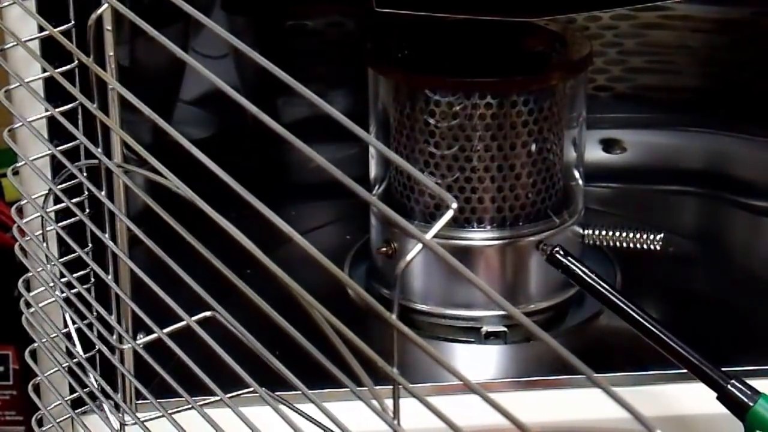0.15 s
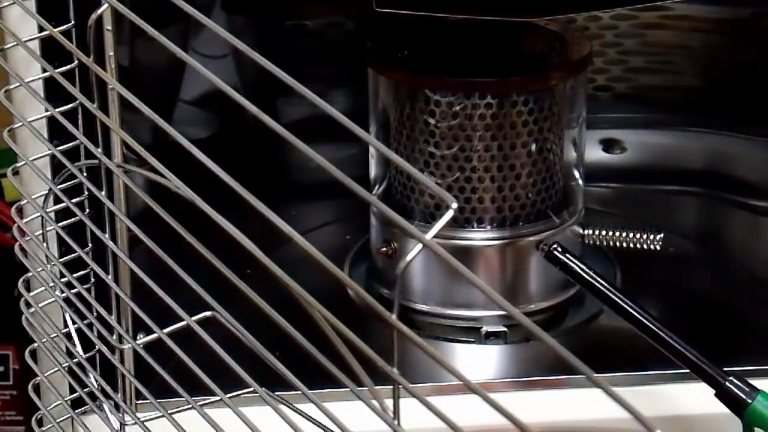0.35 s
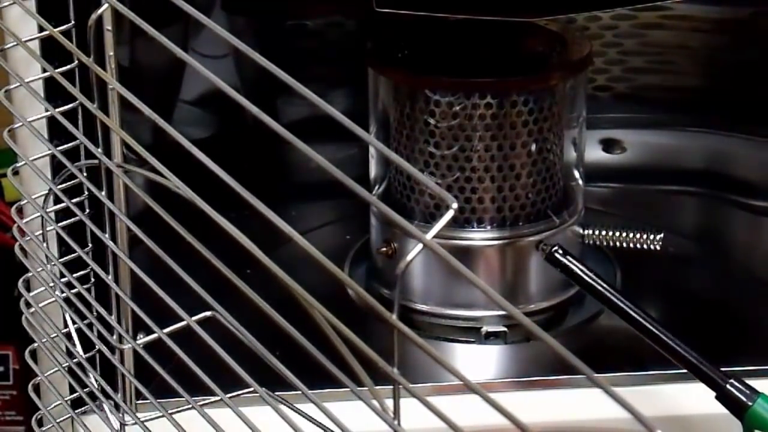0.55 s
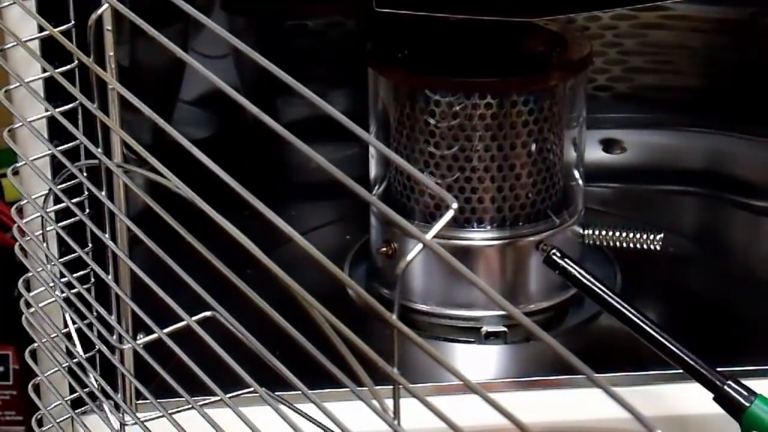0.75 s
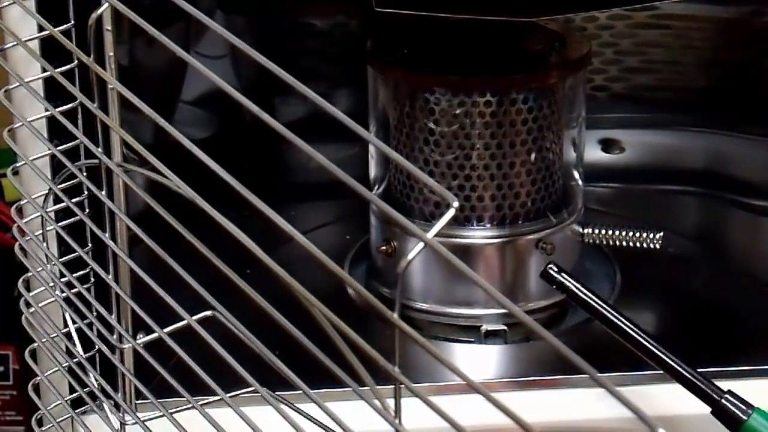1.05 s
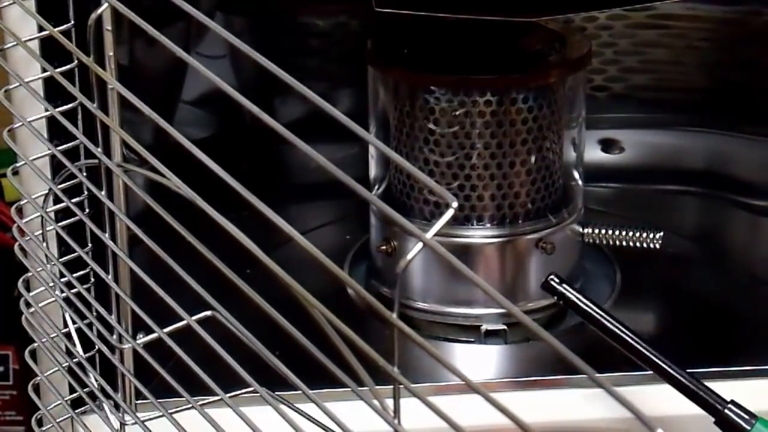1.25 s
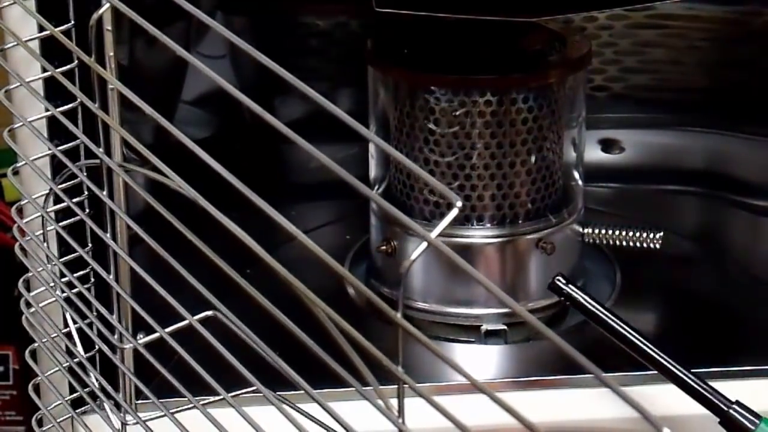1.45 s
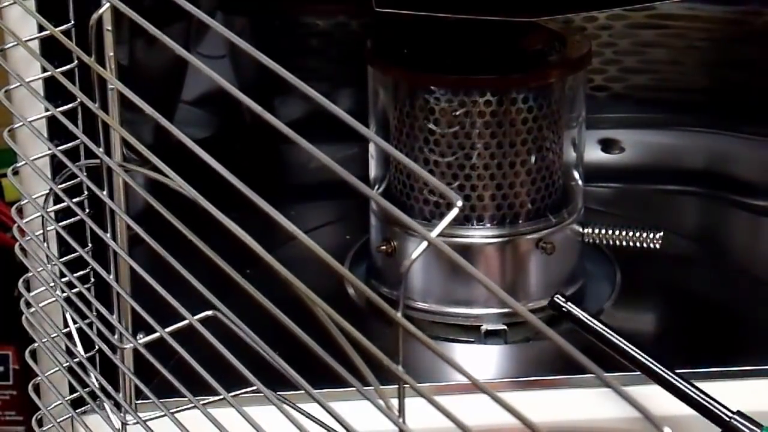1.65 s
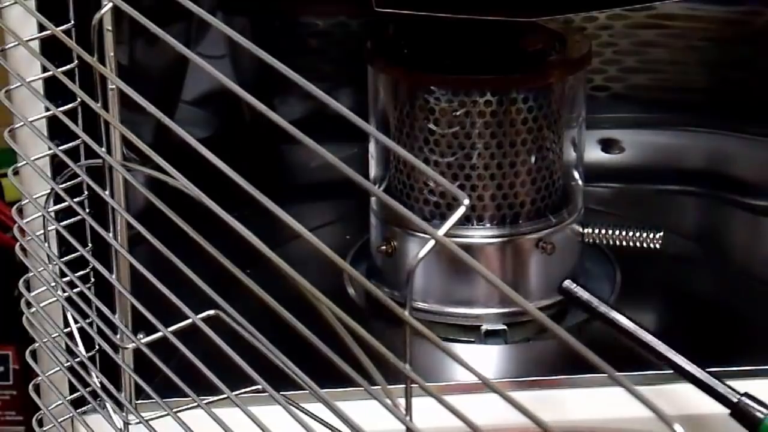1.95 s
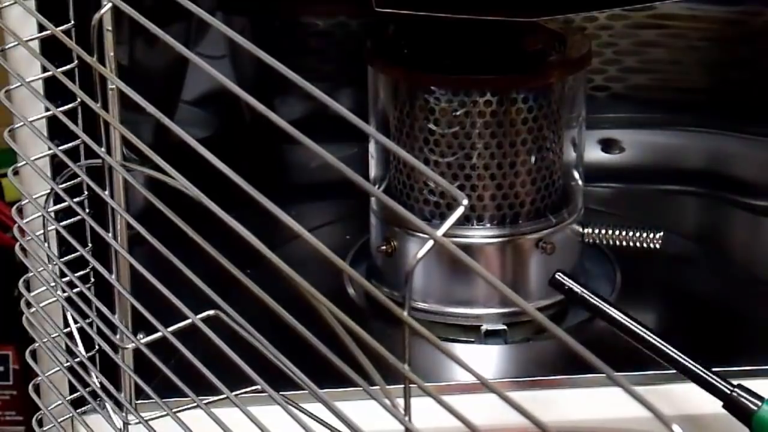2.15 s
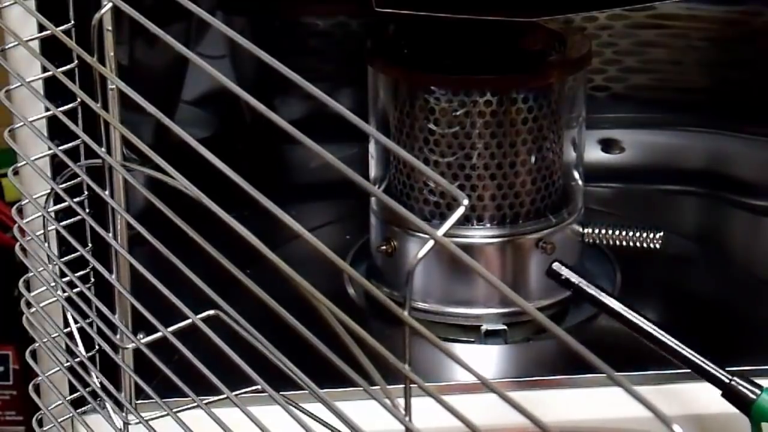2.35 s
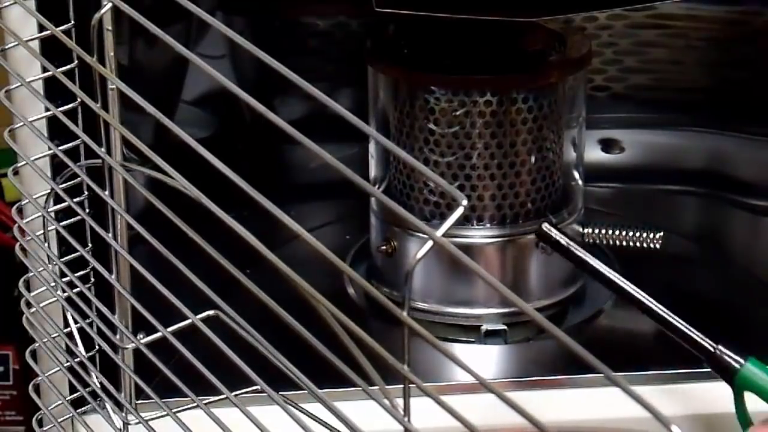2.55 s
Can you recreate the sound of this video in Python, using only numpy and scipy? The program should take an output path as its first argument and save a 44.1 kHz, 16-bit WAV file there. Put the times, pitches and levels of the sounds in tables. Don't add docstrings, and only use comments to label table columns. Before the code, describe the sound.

A utility lighter's igniter snaps nine times, very close to a small overloading microphone, with light plastic trigger ticks between snaps, thin metallic ringing and short garage echoes over faint hiss and hum.

```python
import sys
import numpy as np
from scipy import signal
from scipy.fft import rfft, irfft, next_fast_len
from scipy.io import wavfile
from scipy.ndimage import uniform_filter1d, map_coordinates

SR = 44100
rng = np.random.default_rng(int(sys.argv[2]) if len(sys.argv) > 2 else 0)


def volts_from_decibels(level):
    exponent = np.asarray(level, float) / 20
    return 10 ** exponent


def to_wav(s):
    ch = np.atleast_2d(s).T
    pcm = np.round(np.clip(ch, -1, 1) * 32767)
    wavfile.write(sys.argv[1], SR, pcm.astype(np.int16))


N = 119070


def hammer():
    # t/s, peak level/dB, grip/0-1 from first to second hold, rebound level/dB, lowest rings level/dB
    snaps = [
        (0.2083, -2.5, 0.02, -14, -0.5),
        (.6047, -3, 0.12, -26, 2),
        (0.9409, -3, 0.11, -23, 2.5),
        (1.264, -4, 0.42, -15, 4.5),
        (1.5135, -3.5, 0.38, -22, 4),
        (1.7244, -3.5, 0.67, -8, -13),
        (1.9223, -3.5, 0.75, -4, 1.5),
        (2.1366, -3, 0.95, -1, 0),
        (2.3644, -1.5, 0.98, -10, -1.5),
    ]
    # push level/dB, push length/s, push over its recoil/ratio, knock level/dB, echo
    # level/dB
    thumps = [
        (-23.5, .00035, 2.35, -41, 0.6),
        (-25, .00037, 2.03, -41, 0.1),
        (-24.5, .0004, 2.3, -37, 0.1),
        (-38, 0.00085, 2.3, -55, 1.5),
        (-33, .001, 3, -38.5, 1.9),
        (-32.5, .0007, 2.4, -49, 2.5),
        (-34.5, 0.00058, 2.9, -32, 2.5),
        (-26.5, .0007, 2.05, -37, 1.5),
        (-25, .0008, 2.15, -32, -1),
    ]
    # f/Hz, level/dB
    crack_colour = [(500, -51), (1150, -9), (1700, 1.5), (3300, 2.5), (6000, 1.3), (11500, -2.5),
                    (14000, -12), (16000, -12)]
    spark_db, spark_hold_s, spark_t60_s, spark_tilt_db = -4.5, 0.00053, 0.0055, 5.5
    out, t = np.zeros(N + 2 * SR), np.arange(SR // 20) / SR
    room, snap, metal = rng.standard_normal(SR), rng.standard_normal(len(t)), shell()
    for (s, db, grip, rebound_db, core_db), (push_db, push_s, lean, knock_db, echo_db) in zip(snaps, thumps):
        room, snap = kin(room), kin(snap)
        blow, core = body(t, grip, rebound_db, core_db)
        direct = blow + volts_from_decibels(-6) * crack(snap, t, crack_colour, hold_s=0.0024, t60=0.012)
        add(out, s, volts_from_decibels(db) * direct)
        spark = crack(snap[::-1], t, crack_colour, spark_hold_s, spark_t60_s, spark_tilt_db, 0.000528)
        add(out, s, volts_from_decibels(db + spark_db) * spark)
        add(out, s, volts_from_decibels(db + echo_db) * echoes(direct + 0.84 * (1 - volts_from_decibels(core_db)) * core))
        add(out, s, volts_from_decibels(db + echo_db / 2) * (garage(room, grip) + volts_from_decibels(4.5) * metal))
        add(out, s, thump(t, push_db, push_s, lean, knock_db))
    return out[:N]


def body(t, grip, rebound_db, core_db):
    # f/Hz, width/Hz, level/dB
    first_hold = [(1734, 280, -18), (4256, 240, -12.5), (4930, 200, -12), (5745, 400, -2.5),
                  (8980, 250, -12), (9080, 340, -8.5), (11255, 700, -14), (13400, 450, -29)]
    second_hold = [(4944, 370, -9), (5760, 180, -14), (6520, 290, -15), (8040, 290, -35), (8950, 140, -28),
                   (9570, 310, -9.5), (11400, 230, -20), (12520, 240, -19), (13000, 490, -31)]
    # f/Hz, width/Hz, level/dB
    first_core = [(3368, 270, -3), (2695, 200, -15.5)]
    second_core = [(3351, 500, -4), (2791, 200, -6), (3021, 200, -6.5)]
    # f/Hz, width/Hz, level/dB
    late_rings = [(5140, 270, -13), (5825, 230, -9), (6546, 200, -12.5), (7420, 400, -24)]
    swell_s, second_swell_s, late_swell_s = 0.0033, 0.0028, 0.0078
    rebound_s, damp_s, damp_t60_s = 0.0036, 0.0044, 0.011
    core = (1 - grip) * ring(first_core, t, swell_s) + grip * ring(second_core, t, second_swell_s)
    upper = (1 - grip) * ring(first_hold, t, swell_s) + grip * ring(second_hold, t, swell_s)
    blow = 0.86 * (upper + volts_from_decibels(core_db) * core)
    blow = blow + volts_from_decibels(rebound_db) * np.roll(blow, round(rebound_s * SR))
    blow = blow + ring(late_rings, t, late_swell_s)
    return blow * volts_from_decibels(-60 * np.clip(t - damp_s, 0, 1) / damp_t60_s), core


def thump(t, push_db, push_s, lean, knock_db):
    knock_hz, knock_s = 787, 0.0038
    u = t / push_s
    push = volts_from_decibels(push_db) * u * (lean - u) * np.exp(-u)
    swell = np.sin(np.pi * np.clip(t / knock_s, 0, 1))
    return push - volts_from_decibels(knock_db) * swell * np.sin(2 * np.pi * knock_hz * t)


def ring(modes, t, swell_s, tilt_db=0):
    swell_hz, swell_law, swell_shape = 3300, 1.5, 5
    hz, _, db = np.transpose(modes)[:, :, None]
    luck = rng.standard_normal((2, len(modes), 1))
    peak_s = swell_s * np.clip(swell_hz / hz, 0.1, 1.1) ** swell_law + 0.00046
    u = t / peak_s
    gain = volts_from_decibels(db + 0.37 * luck[0] + tilt_db * np.log2(hz / 5000))
    gain = gain * np.sqrt(u[:, 1:2] / u[:, 1].min())
    swell = (u * np.exp(1 - u)) ** swell_shape
    return np.sum(gain * swell * np.sin(2 * np.pi * (hz * t + luck[1])), 0)


def crack(noise, t, colour, hold_s, t60, tilt_db=0, rise_s=0.00059):
    noise = filtered(noise, lambda f: volts_from_decibels(along(colour, f) + tilt_db * np.log2((f + 1) / 5000)))
    fall = volts_from_decibels(-60 * np.clip(t - hold_s, 0, 1) / t60)
    return unit(noise) * fall * np.clip(t / rise_s, 0, 1) ** 2


def kin(noise):
    # f/Hz, likeness/0-1
    alike = [(1500, .96), (3500, .93), (6000, .86), (10000, .6), (16000, .4)]
    fresh = filtered(rng.standard_normal(len(noise)), lambda f: np.sqrt(1 - along(alike, f) ** 2))
    return filtered(noise, lambda f: along(alike, f)) + fresh


def trigger():
    # t/s, peak level/dB, brightness/dB per octave
    ticks = [(.455, -33, -3), (0.4612, -21.5, 1), (0.472, -35, -7), (0.8224, -19, 0.5), (0.8884, -36, 4),
             (1.1365, -19.5, 2.5), (1.4317, -17.5, -0.5), (1.6486, -18, 2), (1.8574, -19, -2),
             (1.851, -27, -2), (2.0664, -16.5, 0.5), (1.4287, -23.5, 0), (2.3005, -19.5, -1.5),
             (2.3087, -37, -3), (1.6405, -25, -3), (2.5615, -27, -6), (2.573, -30, -6), (.832, -34, -5),
             (1.148, -27, -3)]
    # t/s, peak level/dB, brightness/dB per octave
    take_ups = [
        (.5412, -28.5, -1.5),
        (.8994, -29, -1.5),
        (1.2226, -26.5, -2.5),
        (1.4785, -28, -4),
        (1.697, -26, -2.5),
        (1.885, -28, -4),
        (2.104, -30, -3.5),
        (2.335, -30, -3.5),
        (1.232, -28, -3),
    ]
    # t/s, peak level/dB, brightness/dB per octave
    stops = [
        (2.2898, -10.5, 0),
        (2.5587, -13.5, 1),
        (3.5, -24, -1),
        (3, -27, 0),
        (2.5785, -25, 0),
    ]
    # f/Hz, width/Hz, level/dB
    trigger_modes = [(2047, 390, -16), (4456, 370, 1), (4750, 200, -4), (4000, 200, -8), (5770, 220, -15),
                     (6700, 280, -8), (7000, 360, -18), (10300, 540, -5.5), (11600, 250, -7.5),
                     (13600, 370, -18),
                     (1287, 200, -13), (15300, 400, -21)]
    slack_modes = [(1280, 250, -12), (2130, 300, -6), (6900, 300, 4), (8700, 400, -7), (11600, 400, 0)]
    stop_modes = [(1280, 200, -19), (4430, 300, -1), (5800, 300, 3), (6870, 300, -3), (7530, 300, 1.5),
                  (10640, 400, -4)]
    # f/Hz, level/dB
    tick_colour = [(500, -57), (1200, -16), (2500, 2), (4500, 2), (7000, 0), (11000, -5.5), (14000, -9),
                   (16000, -28)]
    slack_colour = [(500, -55), (1200, -9), (2500, -3), (4500, -1), (7000, 1), (12000, -6), (16000, -20)]
    swell_s, tick_db, crack_db, crack_t60_s, room_db = 0.0017, -13.5, 3.5, 0.033, -8
    out, t = np.zeros(N + 2 * SR), np.arange(SR // 20) / SR
    motions = ((ticks, trigger_modes, tick_colour),
               (take_ups, slack_modes, slack_colour),
               (stops, stop_modes, tick_colour))
    for rows, modes, colour in motions:
        room = garage(rng.standard_normal(SR))
        for s, db, tilt_db in rows:
            noise = rng.standard_normal(len(t))
            grit = volts_from_decibels(crack_db) * crack(noise, t, colour, 0.0018, crack_t60_s, tilt_db, 0.00117)
            add(out, s, volts_from_decibels(db + tick_db) * (ring(modes, t, swell_s, tilt_db) + grit))
            add(out, s, volts_from_decibels(db + room_db) * room)
    return out[:N]


def shell():
    # f/Hz, level/dB, t60/s
    shell_modes = [(1788, -50, 0.25), (2100, -47.5, 0.76), (2070, -41, 0.55), (2230, -38, 0.55),
                   (2260, -52.5, 0.71), (2349, -49.5, 0.98), (2630, -47, 0.34), (2850, -43, 0.22),
                   (3060, -30, 0.3), (3170, -34, 0.31), (3310, -32.5, 0.47), (3340, -35.5, 0.58),
                   (5200, -39.5, 0.34), (5890, -40, 0.38)]
    hz, db, t60 = np.transpose(shell_modes)[:, :, None]
    t, luck = np.arange(SR) / SR, rng.standard_normal((2, len(shell_modes), 1))
    walk = rng.standard_normal((len(shell_modes), SR // 64 + 1)).cumsum(1)
    drift = uniform_filter1d(walk, size=8).repeat(64, axis=1)[:, :SR] / 4
    drift = uniform_filter1d(drift, size=64)
    fall = volts_from_decibels(db + 2.7 * luck[0] - 60 * t / t60)
    modes = fall * np.sin(2 * np.pi * (hz * t + 0.2 * luck[1] + 0.064 * drift))
    return modes.sum(0) * (1 - np.exp(-t / 0.04))


def echoes(x):
    # delay t/s, level/dB
    returns = [(.0062, -9), (.0089, -7.5), (.0137, -14), (.0167, -12.5), (.0215, -14.5), (.0307, -23.5),
               (.0377, -17.5), (.0442, -17.5), (.0492, -22), (.057, -21), (.063, -24.5)]
    # f/Hz, level/dB
    return_colour = [(1000, -11.5), (2000, -3.5), (3300, -2), (4500, -10), (6500, -7.5), (9000, -9.5),
                     (16000, -22)]
    out = np.zeros(SR // 5)
    for s, db in returns:
        add(out, s, volts_from_decibels(db) * x)
    return filtered(out, lambda f: volts_from_decibels(along(return_colour, f)))


def garage(noise, grip=0.44):
    # f/Hz, level/dB
    near_colour = [(500, -61), (1000, -31), (1500, -10.5), (3000, -9.5), (4000, -6.5), (6500, -10.5),
                   (7200, -12), (16000, -17)]
    far_colour = [(500, -40), (1000, -21), (1500, -8), (3000, -5), (4000, -7.5), (6500, -6.5),
                  (7200, -12.5), (16000, -15)]
    # f/Hz, t60/s
    wall_decay = [(800, 0.53), (2100, 0.81), (5500, 0.62), (9000, 0.51), (15000, 0.19)]
    near = answer(noise[::-1], 0.008, lambda hz: 0.063 + 0 * hz, near_colour, grip)
    far = answer(noise, 0.004, lambda hz: along(wall_decay, hz), far_colour, grip)
    return volts_from_decibels(7.5) * near + volts_from_decibels(11) * far


def answer(noise, delay_s, t60, colour, grip):
    # f/Hz, width/Hz, level/dB
    body_humps = [(2180, 130, 7.5), (3307, 190, 7.5), (5410, 440, 3.5), (6290, 200, 5), (9880, 380, 5.5),
                  (1730, 45, 0)]
    # f/Hz, width/Hz, level/dB at grip 0, level/dB at grip 1
    opening = (2767, 170, -0.5, 9.5)
    c, w, db0, db1 = opening
    shape = humped(colour, body_humps + [(c, w, db0 + grip * (db1 - db0))])
    hz, t, z = signal.stft(filtered(noise, shape), SR, nperseg=128)
    fall = volts_from_decibels(-60 * t / t60(hz)[:, None])
    tail = signal.istft(z * fall, SR, nperseg=128)[1][:SR]
    tail = tail * np.clip(np.arange(SR) / SR / delay_s - 0.5, 0, 1)
    return tail / np.linalg.norm(tail)


def background():
    # f/Hz, level/dB per Hz
    hiss_colour = [(20, -9), (70, -22.5), (300, -24.5), (1000, -11), (2300, -4.5), (4500, -15),
                   (8000, -13.5), (16000, -19)]
    # f/Hz, width/Hz, level/dB
    hiss_humps = [(2320, 170, 7.5), (3440, 230, 7.7), (6760, 320, 1.6), (8000, 300, 4.5), (7950, 28, 8.3),
                  (12600, 400, 7.4), (607, 68, 9.3), (878, 58, 9.6), (60.4, 17, 12)]
    # f/Hz, level/dB
    hum_tones = [(60, -76.5), (120, -81)]
    hiss = unit(filtered(rng.standard_normal(N), humped(hiss_colour, hiss_humps)))
    waver = 2.2 * map_coordinates(rng.standard_normal(40), [np.arange(N) * 12 / SR])
    t = np.arange(N) / SR
    hum = sum(volts_from_decibels(db + waver) * np.sin(2 * np.pi * hz * t) for hz, db in hum_tones)
    return volts_from_decibels(-50.5) * hiss + hum


def humped(points, humps):
    def response(f):
        peaks = sum(db * np.exp(-((f - c) / w) ** 2) for c, w, db in humps)
        return volts_from_decibels(along(points, f) + peaks)
    return response


def along(points, hz):
    f, v = np.transpose(points)
    return np.interp(np.log(hz + 1), np.log(f + 1), v)


def filtered(x, response):
    m = next_fast_len(len(x) + 8192)
    return irfft(rfft(x, m) * response(np.fft.rfftfreq(m, 1 / SR)), m)[:len(x)]


def unit(x):
    return x / np.sqrt(np.mean(x ** 2) + 1e-20)


def add(out, s, x):
    out[round(s * SR):][:len(x)] += x


def scene():
    return (hammer() + trigger() + background())[None]


def low_pass(x):
    return signal.sosfilt(signal.butter(12, 17160, fs=SR, output="sos"), x)


def record(dry):
    mic_top_hz, top_hz, edge_hz = 15800, 17100, 150
    duck_db, duck_above_db, duck_s = 0.5, -31.5, 0.015
    ceiling, knee = 0.79, 7
    low_hz, low_db = 1100, -22
    spill_db, spill_steep = -13, 30

    def below(limit_hz):
        return lambda f: np.clip((limit_hz - f) / edge_hz, 0, 1)

    def thinned(f):
        bass = low_db / (1 + (f / low_hz) ** 6)
        spill = spill_db / (1 + (mic_top_hz / (f + 1)) ** spill_steep)
        return volts_from_decibels(bass + spill)

    x = filtered(dry[0], below(mic_top_hz))
    level_db = 10 * np.log10(np.abs(uniform_filter1d(x ** 2, size=200)) + 1e-12)
    over = np.clip(level_db - duck_above_db, 0, None)
    step = 1 / (duck_s * SR)
    duck = signal.lfilter([step], [1, step - 1], over)
    x = x * volts_from_decibels(-duck_db * duck / 10)
    overload = x / (1 + np.abs(x / ceiling) ** knee) ** (1 / knee) - x
    x = x + filtered(overload, thinned)
    return low_pass(filtered(x, below(top_hz))[None])


dry = scene()
out = record(dry)
to_wav(out)
```